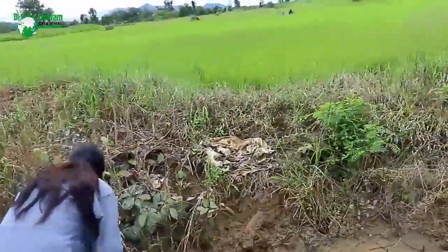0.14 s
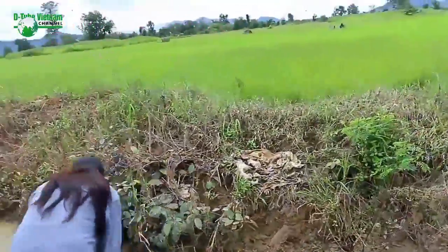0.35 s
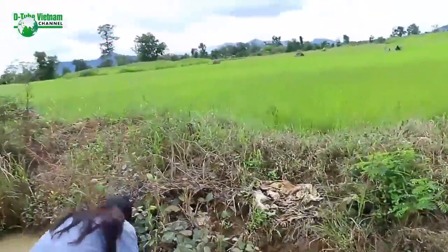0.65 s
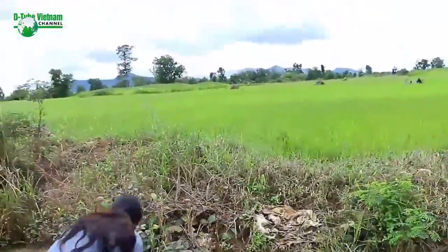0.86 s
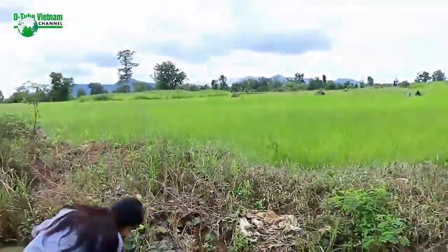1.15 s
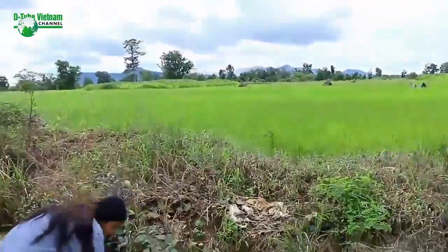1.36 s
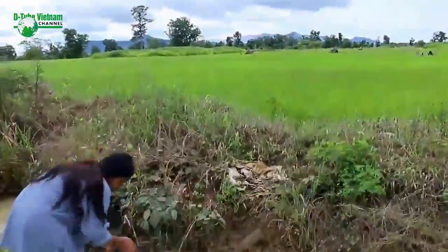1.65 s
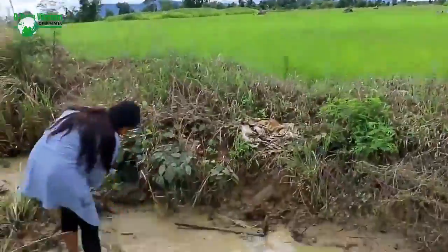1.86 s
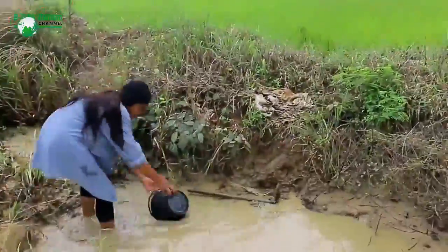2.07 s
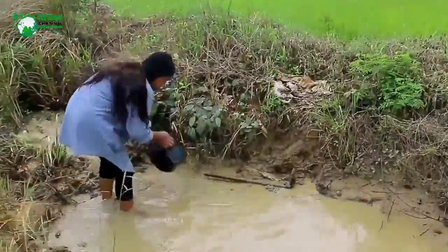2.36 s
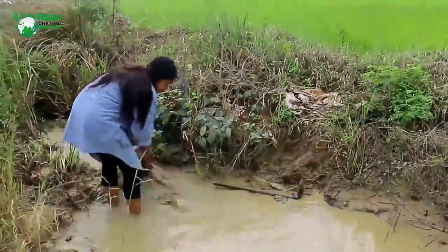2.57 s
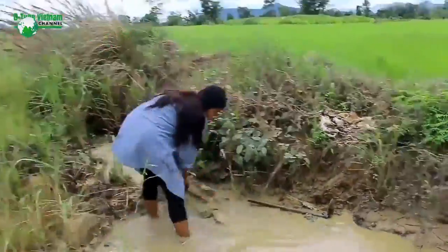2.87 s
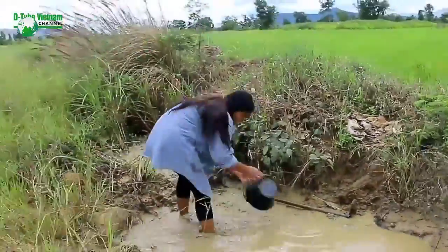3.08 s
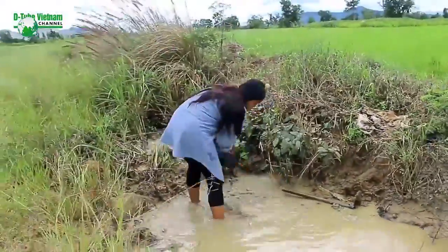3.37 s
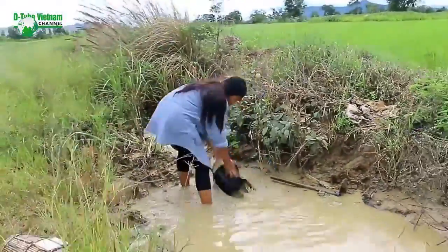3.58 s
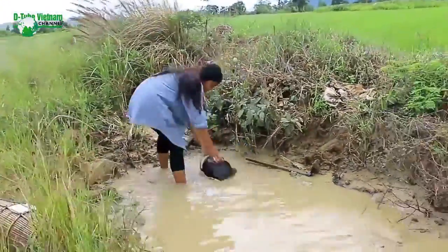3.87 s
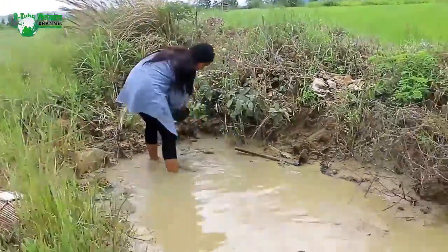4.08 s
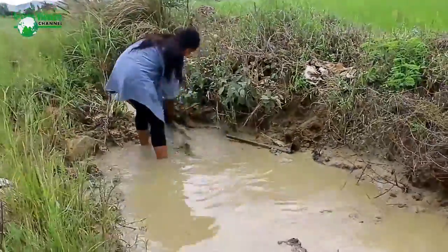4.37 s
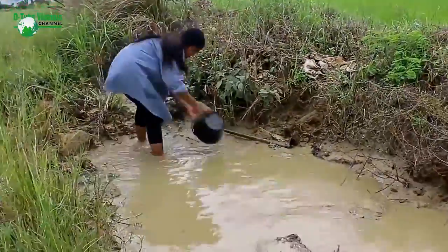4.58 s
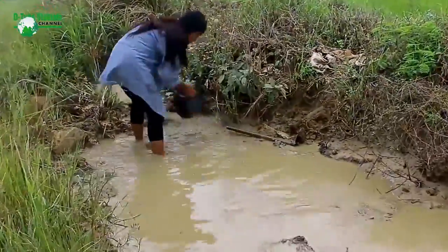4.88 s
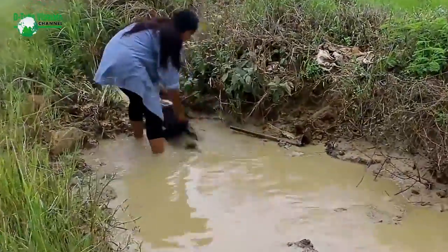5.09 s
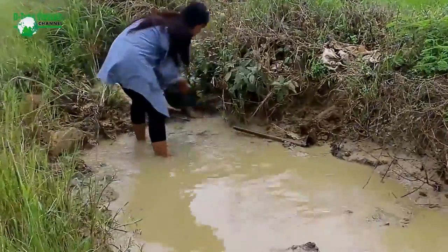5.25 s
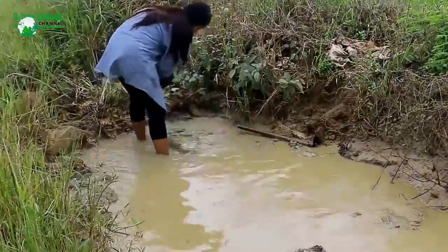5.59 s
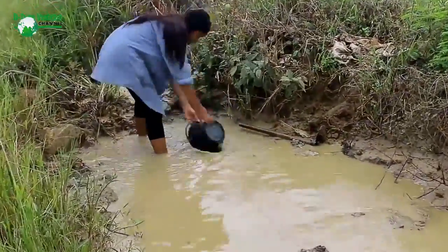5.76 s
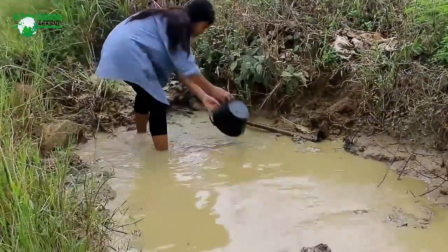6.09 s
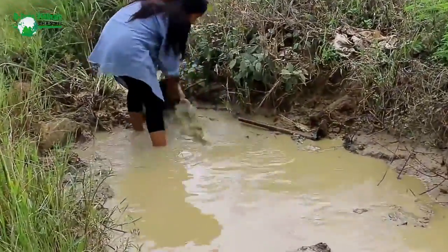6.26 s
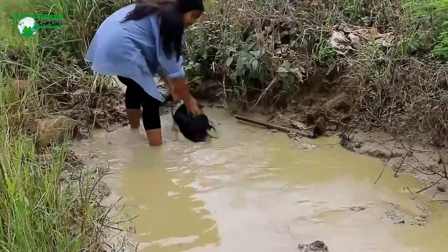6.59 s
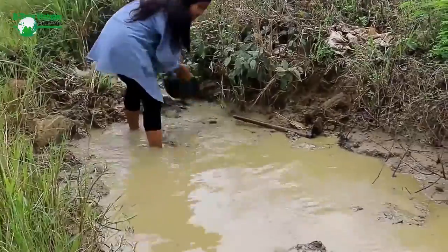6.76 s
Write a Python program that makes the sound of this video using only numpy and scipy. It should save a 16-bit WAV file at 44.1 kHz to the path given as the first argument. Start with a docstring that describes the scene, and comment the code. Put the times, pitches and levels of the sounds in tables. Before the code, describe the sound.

Outdoors beside a field, steady fast bailing: dip, swelling swish, then a sharp watery slap with hollow gulping, repeated throughout with slight variation. Stray drops and slops fill the gaps over a thin trickle. Gusts strike the stereo microphones separately, often harder on the left, as low rumbles and dull thumps, strongest in the middle. Tiny high bird notes and a faint hush lie behind the close, fairly dry water.

```python
"""Bailing a muddy pool

Someone standing in a shallow pool bails it with a small bucket, nearly three times a second.
Each throw is a swish of stirred noise, a slap of dense patter with gulping, rising tones for trapped air,
and smaller slops and a steady trickle. The bucket rings as hollow, tuned noise.
Gusts buffet the two microphones of a camera on the bank: low rumble, flutter, thumps and one hoot.
Small birds chip in the field as short gliding tones, over a faint hush of noise."""
import sys
import numpy as np
from scipy import signal
from scipy.fft import rfft, irfft, next_fast_len
from scipy.io import wavfile
from scipy.ndimage import map_coordinates

SR = 44100
rng = np.random.default_rng(int(sys.argv[2]) if len(sys.argv) > 2 else 0)


def transcribe(u):
    """Save the signal u as a 16-bit wav file named by the first command-line argument.

    u: samples, shape (n,) or (channels, n), limited to [-1, 1]; the rate is SR.
    q: integer samples, one column per channel.
    """
    v = np.clip(np.atleast_2d(u).T, -1, 1)
    q = np.round(v * 32767).astype(np.int16)
    wavfile.write(sys.argv[1], SR, q)


N = 305613  # length in samples

# Levels in the tables are relative: the functions add further gains when mixing.
# Throws of the bucket. Each row: landing in seconds, how long before it the bucket dips in seconds,
# dip length in seconds, dip level in dB, dip spray in dB, swash in dB, ring of the bucket in dB,
# slap length in seconds, thud in dB, splat in dB.
THROWS = [(0.132, .19, .026, -48, -59, -30.5, -44, 0.011, -20, -22.5),
          (0.517, 0.14, 0.037, -35, -49, -31, -40, 0.017, -19.5, -20),
          (0.879, 0.19, 0.013, -33, -53, -33.5, -35.5, 0.017, -27.5, -36),
          (1.262, 0.25, 0.075, -33.5, -53, -32.5, -38, .017, -17, -25),
          (1.631, 0.19, 0.011, -32, -46, -33.5, -46, 0.024, -24, -26.5),
          (1.984, 0.32, 0.043, -46, -72, -33, -40, 0.021, -27, -25.5),
          (2.355, 0.19, 0.083, -35, -49, -36.5, -54, 0.023, -22.5, -25.5),
          (2.726, 0.2, 0.031, -35.5, -51, -34.5, -41, 0.021, -23, -25.5),
          (3.075, 0.2, 0.05, -32.5, -47, -35.5, -49, 0.015, -18, -25),
          (3.444, 0.19, 0.034, -36, -49, -34.5, -39, 0.016, -28, -41),
          (3.805, 0.19, 0.016, -38.5, -45, -70, -42.5, 0.014, -30.5, -63),
          (4.18, 0.2, 0.022, -54, -51, -43, -45, 0.011, -25.5, -27),
          (4.539, 0.216, 0.12, -37.5, -50.5, -40.5, -37.5, 0.021, -21.5, -25),
          (4.922, 0.21, 0.061, -31, -48.5, -39, -35, 0.022, -21, -25),
          (5.303, 0.19, 0.03, -36, -53, -39.5, -36, 0.014, -23.5, -24.5),
          (5.678, .2, 0.044, -34, -47, -39.5, -30, 0.014, -23, -23.5),
          (6.048, 0.18, 0.054, -35.5, -49.5, -43.5, -46, 0.044, -49, -30.5),
          (6.432, 0.19, 0.047, -41, -47.5, -36, -38, 0.015, -30, -28.5),
          (6.8, 0.19, 0.063, -37, -47.5, -37, -38, 0.028, -33.5, -31.5)]
# Stray water falling back. Each row: start in seconds, length in seconds, thud in dB, splat in dB.
SLOPS = [(0.262, 0.013, -43, -34), (0.427, 0.029, -55, -44), (0.611, 0.0093, -28, -34),
         (0.808, .04, -32, -35), (1.43, 0.019, -33, -33), (1.769, 0.026, -34, -36),
         (2.082, 0.0087, -35, -32.5), (2.826, 0.019, -26, -29.5), (2.919, 0.0072, -41, -37),
         (3.172, 0.0066, -25, -24.5), (3.276, 0.013, -49, -31.5), (3.368, 0.019, -33, -43),
         (3.636, 0.013, -44, -36), (5.03, 0.011, -31, -34.5), (5.133, 0.0073, -49, -33.5),
         (5.397, 0.008, -49, -32), (5.468, 0.0069, -53, -29), (5.631, 0.0061, -28, -33),
         (5.773, 0.0095, -28, -37), (5.822, 0.0079, -34, -37.5), (6.161, 0.023, -32, -31.5),
         (6.211, 0.0099, -52, -31), (6.562, 0.0095, -32.5, -35)]
# Large pockets of air trapped by landing water. Each row: start in seconds, level in dB, pitch in Hz.
GULPS = [(0.1245, -3.5, 347), (0.1314, -7, 408), (0.5303, -2.5, 1060), (0.614, -19.5, 398),
         (0.879, -14.5, 360), (1.2685, -5.5, 910), (1.2748, -10, 516), (1.28, -10, 880),
         (1.4277, -11.5, 910), (1.637, -20, 615), (2.002, -12.5, 390), (2.3626, -17, 674),
         (2.7259, -5, 1150), (2.832, -14, 570), (2.9558, -6, 380), (3.073, -7, 320), (3.083, -20, 764),
         (3.177, -14, 287), (3.4434, -5, 600), (3.64, -13, 510), (3.882, -12.5, 500), (4.184, -10, 425),
         (4.5207, -17, 416), (4.534, -3.5, 378), (4.552, -7, 417), (4.9199, -8.5, 396), (4.928, -10.5, 510),
         (4.9369, -5.5, 575), (5.133, -22, 980), (5.303, -7, 377), (5.311, -4, 407), (5.3183, -4, 620),
         (5.629, -11, 865), (5.671, -8, 1940), (5.6725, -7.5, 780), (5.676, -2, 414), (6.062, -28, 620),
         (6.1646, -16, 340), (6.432, -22, 417), (6.442, -19, 474), (6.566, -20, 590)]
# Cavities that close with a bloop. Each row: start in seconds, first pitch in Hz, level in dB,
# cycles of ring, share by which the pitch rises in that time.
BLOOPS = [(0.127, 838, -15.5, 3.8, 1), (0.143, 653, -26, 8.1, 0.34), (0.51, 1190, -27, 11.6, 0.84),
          (0.673, 730, -38, 15.4, 0.53), (1.778, 700, -26.5, 7.2, 0.26), (2.557, 1250, -31, 16, 0.12),
          (2.886, 1000, -36, 4.7, .1), (4.238, 2070, -30.5, 10, .05), (4.766, 892, -30, 10, .05),
          (5.4942, 486, -23, 3.6, 0.83), (5.515, 1570, -32, 10, 0.043), (5.634, 850, -22.5, 6.3, 0.016),
          (5.766, 314, -18, 2.3, 0.98), (5.789, 370, -29.5, 3.7, 0.076), (5.823, 1730, -33, 9, 0.027),
          (6.562, 1260, -33, 16, 0.035)]
# Single sharp drops. Each row: start in seconds, level in dB, middle pitch in Hz.
DROPS = [(2.238, -19.5, 4220), (2.556, -25, 2900), (4.993, -21, 4030), (5.084, -15.5, 3050)]
# Tone colour of the water sounds. Each row: frequency in Hz, relative level in dB.
THUD_COLOUR = [(120, -6), (250, 6.5), (380, -1), (700, 3.5), (1050, -7), (1500, -67), (3000, -32)]
SPLAT_COLOUR = [(600, -6), (1050, -7), (1800, -3), (3300, -6.5), (4600, -14), (8000, -50)]
SPRAY_COLOUR = [(2500, 2.5), (4500, -1), (6000, -1.5), (8000, -2.5), (11000, -6.5), (15500, -14.5)]
SLOSH_COLOUR = [(150, -50), (250, 1), (313, 3.5), (455, 1.5), (521, -18), (624, -0.5), (693, -3.5),
                (1150, -20), (1400, -0.5), (1920, -6.5), (2370, 0), (2590, -2), (3770, -2.5), (5250, -9),
                (9000, -20.5), (11700, -63), (19800, -120)]
GURGLE_COLOUR = [(300, 6), (450, -20), (700, 7), (1050, 9), (1600, -9), (2300, -7), (4000, -21)]
# Rise and fall of the spray. Each row: time in seconds, level in dB.
SPRAY_LEVEL = [(0, -1), (.6, -2.5), (1.2, -1), (1.7, 0.5), (2.3, 2.5), (2.9, 2), (3.5, 0), (4.1, -0.5),
               (4.7, 1), (5.5, 1.5), (6.2, 1.5), (6.93, 0)]
# How hollow the stirred water sounds. Each row: time in seconds, lift of the gurgle in dB.
HOLLOWNESS = [(0, 4.5), (.5, 7), (1, 4), (1.5, 8.5), (2, 6.5), (2.5, 1.5), (3.3, 2.5), (4, 7), (5, 2),
              (5.7, 2.5), (6.3, 0), (6.93, 1.5)]
# The bucket's hollow, rung by the water. Each row: frequency in Hz, width in Hz, level in dB.
BUCKET_TONES = [(376, 53, -2), (670, 92, 1.5), (998, 43, 4), (1680, 78, -10.5)]
# How much the water's sound differs between the microphones.
# Each row: frequency in Hz, share from 0 (the same in both) to 1 (unrelated).
SCATTER = [(100, .3), (400, .07), (1000, .07), (2200, .22), (4000, .46), (15000, .58)]
# Bearing of the bucket. Each row: time in seconds, delay of the left microphone in milliseconds.
LEAD = [(0, 0.11), (1.5, 0.092), (2.3, 0.058), (3.5, 0.034), (4.5, 0.035), (6.93, 0.044)]
# Gusts. Each row: time in seconds, buffet in dB, left minus right in dB, flutter in dB.
WIND = [(0, -84, 1, -71), (.45, -51, 4, -73), (.54, -33, 11, -37), (.68, -34, 1, -68), (.93, -52, -3, -57),
        (1.01, -33.5, 17, -47), (1.3, -28.5, 13, -32.5), (1.7, -38, 16, -61), (1.8, -44.5, -5, -60),
        (1.95, -31, 1.5, -57), (2.2, -29, 15, -40), (2.27, -40, -8, -68), (2.52, -39.5, 17, -56),
        (2.6, -19, 3, -28.5), (2.8, -31.5, 5, -61), (2.97, -28, 1, -17), (3.17, -27, 5, -31),
        (3.25, -41.5, 8, -65), (3.38, -32.5, 6.5, -34), (3.67, -24, 4, -24), (3.94, -32.5, -8, -37),
        (4.12, -32, 17, -26.5), (4.29, -28.5, -8, -36.5), (4.56, -25.5, 2.5, -25), (4.76, -36.5, -22, -28),
        (4.95, -38.5, 0.5, -41.5), (5.1, -32, -15, -37.5), (5.4, -39.5, 11, -40), (5.62, -74, 6, -84),
        (5.92, -39, 3.5, -47), (6.4, -45, -2, -68), (6.69, -33.5, 0, -69), (6.74, -30.5, 13, -37),
        (6.93, -25.5, 13, -28)]
# Tone colour of the wind. Each row: frequency in Hz, relative level in dB.
BUFFET_COLOUR = [(15, -33), (30, -13), (60, -3.5), (90, 2.5), (170, -3), (250, -12.5), (400, -33),
                 (800, -68), (2000, -83)]
FLUTTER_COLOUR = [(70, -49), (140, 5), (220, 3.5), (310, 1), (430, -8), (650, -13.5), (1000, -35),
                  (2500, -68)]
# The hardest eddies striking the microphones.
# Each row: start in seconds, level in dB, left minus right in dB, pitch in Hz before it wavers.
HARD_EDDIES = [(1.023, -19, 22, 204), (1.085, -22, 18, 167), (1.121, -16.5, 23, 187.6),
               (1.202, -15.5, 24, 232), (1.295, -5.5, 21, 193), (1.305, -10.5, 18, 211),
               (1.539, -14, 19, 174), (1.672, -17, 14, 229), (2.137, -23, 14, 250), (2.193, -13, 14, 213),
               (2.612, -6, 12, 278.5), (2.637, -19, 18, 303), (2.648, -18, 0, 205), (2.662, -12.5, -4, 221),
               (2.707, -22, -2, 214), (2.941, -9.5, 14, 254), (2.962, -13, 3, 220), (2.982, -12, 0, 190),
               (3.001, -8, 11, 289), (3.046, -27, -6, 208), (3.486, -10, -6, 199.6),
               (3.518, -12.5, -6, 173), (3.54, -8.5, 3, 275), (3.576, -9, 4, 219), (3.602, -13, -16, 181),
               (3.64, -10, -3, 181.5), (3.663, -18, 0, 175), (3.741, -13.5, 3, 314), (3.755, -7, 9, 176),
               (3.815, -13, 8, 170), (3.881, -10.5, 8, 241), (4.041, -10.5, 18, 264), (4.078, -6.5, 2, 182),
               (4.128, -7.5, 0, 212), (4.151, -7.5, 20, 172), (4.435, -13, 1, 190), (4.458, -11, -4, 202),
               (4.496, -6.5, -3, 191), (4.521, -4, 13, 293), (4.603, -16, -8, 189), (4.62, -9.5, -16, 173),
               (4.631, -13, -23, 258), (4.765, -8, -20, 238), (4.864, -16, 2, 192), (5.376, -15, 27, 173),
               (5.41, -13.5, 18, 181), (5.535, -24.5, 11.5, 112.5), (6.736, -12.5, 28, 167),
               (6.824, -13.5, 15, 196.5), (6.871, -8, 19, 202.4)]
# A gust sounding a microphone port. The one row: start in seconds, length in seconds, level in dB,
# left minus right in dB, pitch in Hz.
HOOT = (4.5, 0.14, -21, -22, 252)
# One bird's thin falling chips. Each row: start in seconds, level in dB, length in seconds,
# middle pitch in Hz.
CHIPS = [(1.883, -37.5, 0.015, 7540), (2.157, -36.5, 0.0081, 7740), (2.203, -45, .009, 7700),
         (2.452, -42, 0.0087, 7660), (2.471, -40, 0.018, 7300), (2.495, -38.5, .009, 7700),
         (2.854, -42, 0.022, 7460), (3.183, -41.5, 0.015, 7550), (3.481, -43, 0.03, 7280),
         (3.817, -49, 0.01, 7250), (3.876, -48, .009, 7350)]
# Another bird's slurred notes. Each row: start in seconds, level in dB, length in seconds,
# first pitch in Hz, last pitch in Hz.
SLURS = [(3.252, -38.5, 0.026, 3750, 4460), (3.338, -37, 0.011, 3870, 2900), (3.42, -46, 0.027, 3450, 4000),
         (3.589, -44.5, .027, 3380, 4150), (3.747, -46.5, 0.025, 3520, 4150),
         (3.771, -49, 0.011, 4130, 3320), (3.917, -45, 0.024, 3350, 4050), (3.947, -45.5, .012, 3880, 3300),
         (4.096, -42, 0.019, 4200, 3300), (4.268, -37.5, 0.012, 4020, 3030), (4.43, -40, 0.021, 4050, 3430),
         (4.601, -38, 0.022, 4020, 2180), (4.778, -36, 0.019, 4240, 2550), (4.953, -37, 0.018, 4400, 3240),
         (5.122, -39, 0.023, 4040, 3070), (5.541, -40, .024, 3400, 3870), (5.707, -39, 0.023, 3320, 4050),
         (5.881, -39, 0.016, 3470, 4100), (5.899, -44, .013, 4000, 2900)]
# Tone colour of the field's hush. Each row: frequency in Hz, relative level in dB.
FIELD_COLOUR = [(30, 5), (150, 13), (500, -8), (850, -3), (1010, 4.5), (1200, -7), (3500, -5), (5500, -14),
                (15000, -41)]

# A thrown sheet builds up more slowly than a slop.
THROW_RISE_S, SLOP_RISE_S = 0.0056, 0.004
SLAP_SPRAY_DB = -10  # fine spray of a slap, set from its splat
CRACK_DB, CRACK_S = -26, .0012  # water snaps shut over a pocket: level set from the gulp, decay
DIP_RISE_S, DIP_FALL_S = 0.011, 0.033  # the rim cuts into the pool
# The swash is full from SWASH_S before the landing, and the ring from POUR_S before it.
SWASH_S, SWASH_RISE_S, SWASH_FALL_S = 0.061, 0.13, 0.038
POUR_S, POUR_RISE_S, POUR_FALL_S = 0.034, 0.019, 0.022
SWASH_SPRAY_DB = -14.5  # set from the swash
TRICKLE_DB, TRICKLE_SPRAY_DB = -44.5, -56.5  # water running back all the time
BUCKET_SLAP_DB, BUCKET_SLOSH_DB = -12, -14  # gain of the hollow ring in the slaps and in the slosh
BUFFET_DB, FLUTTER_DB = 4, 3.5  # gains of the rumble and the flutter
# Ordinary eddies: level set from the buffet, spread of level, central pitch.
EDDIES_PER_S, EDDY_DB, EDDY_SCATTER_DB, EDDY_HZ = 8.7, 10.5, -2, 169
HOOT_WIDTH_HZ = 30  # how far either side of its pitch the hoot reaches
CHIP_FALL_HZ = 550  # how far each chip falls
DUCK_DB, DUCK_RATIO, DUCK_S = -20, 0.29, 0.024  # gain control: threshold, dB lost per dB over it, memory
TOP_HZ = 15500  # band limit


def splashes(fall=0.0059, tail=0.042, tail_db=-23.0, lead=0.078, lead_db=-25):
    """Each sheet of water follows its leading drops, slaps down as a dense, bubbly patter and stops quickly."""
    t, power = np.arange(N) / SR, np.zeros((3, N))
    for s, rise, length, thud_db, splat_db in landings():
        db = [thud_db, splat_db, splat_db + SLAP_SPRAY_DB]
        near = slice(max(int((s - .1) * SR), 0), int((s + .25) * SR))
        before = np.maximum(s - t[near], 0)
        after = np.maximum(t[near] - s - length, 0)
        arrive = np.exp(-before / rise) + amp(lead_db) * np.exp(-before / lead)
        leave = np.exp(-after / fall) + amp(tail_db) * np.exp(-after / tail)
        power[:, near] += (amp(db)[:, None] * arrive * leave) ** 2
    thud, splat, spray = np.sqrt(power)

    slap = coloured(patter(rate=1500, spread_db=3, smooth=.3), THUD_COLOUR)
    slap = unit(np.tanh(.7 * slap))
    hollow = bucket(patter(rate=1500, spread_db=2, smooth=.3))
    spatter = coloured(patter(rate=1300, spread_db=4.5, smooth=.2), SPLAT_COLOUR)
    spatter = patchy(spatter, depth_db=4, width=2, frames=3)
    mist = coloured(patter(rate=5000, spread_db=3.5, smooth=.6), SPRAY_COLOUR)
    mist = patchy(mist, depth_db=3, width=9, frames=2)
    fizz = bubbles(count=3000, centre_hz=1600, octaves=.55, cycles=6, spread_db=3)
    spatter = unit(spatter + amp(-6) * fizz)

    body = thud * (amp(-4.5) * slap + amp(BUCKET_SLAP_DB) * hollow)
    spray_level, = curves(SPRAY_LEVEL)
    return body + amp(-3.0) * splat * spatter + amp(spray_level) * spray * mist


def landings():
    """All water that hits the pool or bank: rows of (s, rise s, length s, thud dB, splat dB)."""
    throws = [(s, THROW_RISE_S, *slap)
              for s, stroke, dip_s, dip, dip_spray, swash, ring, *slap in THROWS]
    slops = [(s, SLOP_RISE_S, *slap) for s, *slap in SLOPS]
    return throws + slops


def plops():
    """Large pockets of air gulp under the slaps, smaller ones bloop, and a few drops tick sharply."""
    track, t = np.zeros(N), np.arange(SR // 20) / SR
    for s, db, hz in GULPS:
        cavity = bubble(t, hz, cycles=1.9, glide=0.04, hold=1.8)
        # a second, higher pitch rings weakly with it
        cavity = cavity + 0.14 * bubble(t, hz * rng.uniform(1.4, 2.08), cycles=2.9, glide=0.165)
        crack = signal.lfilter([1], [1, -.8], rng.standard_normal(len(t))) * np.exp(-t / CRACK_S)
        add(track, s, amp(db - 0.4) * cavity)
        add(track, s + .5 / hz, amp(db + CRACK_DB) * crack)
    for s, hz, db, cycles, glide in BLOOPS:
        add(track, s, amp(db + 3) * bubble(t, hz, cycles, glide, hold=1.8))
    for s, db, hz in DROPS:
        band = signal.butter(2, [hz * .7, hz * 1.3], "bandpass", fs=SR, output="sos")
        snap = unit(signal.sosfilt(band, rng.standard_normal(len(t))))
        add(track, s, amp(db - 1.5) * snap * np.exp(-t / .0016))
    return np.array([track, np.roll(track, SR // 500)])  # the scattered copy is 2 ms late


def slosh():
    """Bucket and legs churn the pool: crackle, gurgle, bubbles, droplets and spray, in small spurts."""
    slosh_gain, spray_gain = stirring()
    hollow_db, = curves(HOLLOWNESS)
    spray_level, = curves(SPRAY_LEVEL)
    surge = spurts(rate=90, life=.007, steady=1.2)
    churn = coloured(patter(rate=2000, spread_db=4.2, smooth=.35), SLOSH_COLOUR)
    churn = patchy(churn, depth_db=3.5, width=1.5, frames=4)
    gurgle = coloured(patter(rate=700, spread_db=3, smooth=.2), GURGLE_COLOUR)
    gurgle = patchy(gurgle, depth_db=4, width=1.5, frames=4)
    hollow = bucket(patter(rate=500, spread_db=3, smooth=.2))
    fizz = bubbles(count=3000, centre_hz=2350, octaves=.44, cycles=12, spread_db=4)
    droplets = bubbles(count=560, centre_hz=1500, octaves=.55, cycles=11, spread_db=3.5)
    cloud = amp(-7.3) * fizz + amp(-10.3) * droplets
    spray = coloured(patter(rate=4500, spread_db=4, smooth=.7), SPRAY_COLOUR)
    spray = patchy(spray, depth_db=4, width=2.5, frames=3)

    body = amp(-3.0 - .5 * hollow_db) * churn  # more gurgle means less crackle
    body += amp(hollow_db - 12.0) * gurgle
    body += amp(BUCKET_SLOSH_DB) * hollow
    body += np.array([cloud, np.roll(cloud, SR // 150)])
    return surge * (slosh_gain * body + amp(spray_level + 7.5) * spray_gain * spray)


def stirring():
    """Gains of slosh and spray: each stroke dips the bucket, then a swash builds until the water lands."""
    dips, dip_sprays, swashes = np.zeros((3, N))
    for s, stroke, dip_s, dip_db, spray_db, swash_db, ring_db, *slap in THROWS:
        dip = swell(s - stroke, dip_s, DIP_RISE_S, DIP_FALL_S)
        swash = swell(s - SWASH_S, SWASH_S + slap[0], SWASH_RISE_S, SWASH_FALL_S)
        dips += (amp(dip_db) * dip) ** 2
        dip_sprays += (amp(spray_db) * dip) ** 2
        swashes += (amp(swash_db) * swash) ** 2
    water = dips + swashes + amp(TRICKLE_DB) ** 2
    spray = dip_sprays + swashes * amp(SWASH_SPRAY_DB) ** 2 + amp(TRICKLE_SPRAY_DB) ** 2
    return np.sqrt(water), np.sqrt(spray)


def pouring():
    """As the water runs out over the rim, the emptying bucket rings."""
    gain = np.zeros(N)
    for s, *stroke, ring_db, length, thud, splat in THROWS:
        gain += amp(ring_db) * swell(s - POUR_S, POUR_S + length, POUR_RISE_S, POUR_FALL_S)
    return gain * bucket(patter(rate=900, spread_db=2, smooth=.2))


def bucket(x):
    """x ringing in the bucket's hollow, at rms 1; the pitch drifts with the water inside."""
    def response(f):
        total = 0
        for k, (centre, width, db) in enumerate(BUCKET_TONES):
            resonance = 1j * f * width / (centre ** 2 - f ** 2 + 1j * f * width)
            total = total + (-1) ** k * amp(db) * resonance
        return total
    ring = filtered(x, response)
    # reading the sound at a wandering pace bends its pitch
    drift = np.arange(N) + .0011 * SR * wobble(12)
    return unit(np.array([np.interp(drift, np.arange(N), row) for row in ring]))


def microphones(pair):
    """Direct sound reaches the right microphone first; what the banks scatter differs between the two."""
    def response(hz):
        share = np.clip(along(SCATTER, hz), 0, 1) / 2
        return np.sqrt([1 - share, share])
    direct, scattered = filtered(pair, response)
    lead_ms, = curves(LEAD)
    left = map_coordinates(direct + scattered, [np.arange(N) - lead_ms * SR / 1000], order=5)
    return np.array([left, direct - scattered])


def wind():
    """Wind hits each microphone separately: a lumpy rumble, and a rough flutter that follows the gusts."""
    buffet_db, pan_db, flutter_db = curves(WIND)
    lumps = unit(amp(4 * np.tanh([wobble(45), wobble(45)])))
    rumble = coloured(rng.standard_normal((2, N)), BUFFET_COLOUR)
    flutter = coloured(patter(rate=220, spread_db=1.5, smooth=.17), FLUTTER_COLOUR)
    gusts = amp(buffet_db + BUFFET_DB) * rumble + amp(flutter_db + FLUTTER_DB) * flutter
    sides = amp([pan_db / 2, -pan_db / 2])
    return lumps * gusts * sides / np.sqrt(np.mean(sides ** 2, axis=0))


def eddies(rise_cycles=0.58, fall_cycles=0.99, waver=0.51):
    """A strong eddy is a thump of a few uneven pressure swings, wavering apart at the two microphones."""
    pair, t = np.zeros((2, N)), np.arange(-SR // 40, SR // 16) / SR
    knot_times = np.linspace(t[0], t[-1], 64)
    for s, db, pan_db, hz in list(HARD_EDDIES) + ordinary_eddies():
        shape = np.exp(np.minimum(t * hz / rise_cycles, -t * hz / fall_cycles))
        sides = unit(amp([pan_db / 2, -pan_db / 2]))
        wavers = np.clip(rng.standard_normal((2, 64)), -2, 1)
        for track, side, knots in zip(pair, sides, wavers):
            pace = hz * np.exp(waver * np.interp(t, knot_times, knots))
            swings = np.sin(2 * np.pi * np.cumsum(pace) / SR)
            add(track, s + t[0], amp(db + 2.5) * side * shape * swings)
    return pair


def ordinary_eddies():
    """Eddies at uneven times, whose level and side follow the wind: rows like those of HARD_EDDIES."""
    count = int(EDDIES_PER_S * N / SR)
    chance = rng.uniform(-0.92, 1, (count, 3))
    s = (np.arange(count) + .5 + chance[:, 0] / 2) / EDDIES_PER_S
    times, buffet_db, pan_db, flutter_db = np.transpose(WIND)
    db = np.interp(s, times, buffet_db) + EDDY_DB + EDDY_SCATTER_DB * chance[:, 1]
    hz = EDDY_HZ * 2 ** (0.724 * chance[:, 2])
    return list(zip(s, db, np.interp(s, times, pan_db), hz))


def hoot():
    """One steady gust draws a low, breathy note, a narrow band of noise, from the right microphone's port."""
    s, length, db, pan_db, hz = HOOT
    noise = rng.standard_normal((2, N))
    note = unit(filtered(noise, lambda f: 1 / (1 + ((f - hz) / HOOT_WIDTH_HZ) ** 4)))
    sides = unit(amp([[pan_db / 2], [-pan_db / 2]]))
    return amp(db) * sides * swell(s, length, rise=.03, fall=0.0071) * note


def birds():
    """Each note is one short, slightly rough glide, blurred by the grass on its way."""
    track = np.zeros(N)
    half = CHIP_FALL_HZ / 2
    chips = [(s, db, length, hz + half, hz - half) for s, db, length, hz in CHIPS]
    for s, db, length, first_hz, last_hz in chips + list(SLURS):
        u = np.linspace(0, 1, max(int(length * SR), 8))
        hz = first_hz + (last_hz - first_hz) * u
        shape = np.sqrt(4 * u * (1 - u))
        add(track, s, amp(db + 4.5) * shape * np.sin(2 * np.pi * np.cumsum(hz) / SR))
    t = np.arange(SR // 10) / SR
    grass = rng.standard_normal((2, len(t))) * np.exp(-t / .008)
    grass = grass / np.linalg.norm(grass[0])
    blurred = signal.fftconvolve(track[None], grass, axes=1)[:, :N]
    roughness = unit(amp(2.3 * wobble(700)))
    return (amp(-2.7) * track + amp(-9.5) * blurred) * roughness


def field():
    """The faint hush of the field is steady, coloured noise."""
    return amp(-45) * coloured(rng.standard_normal((2, N)), FIELD_COLOUR)


def bubble(t, hz, cycles, glide, hold=1):
    """An air pocket rings, its pitch rising as it nears the surface; hold over 1: rings on, then stops short."""
    age = t * hz / cycles
    pitch = hz * (1 + glide * np.minimum(age, 3))
    tone = np.sin(2 * np.pi * np.cumsum(pitch, axis=-1) / SR)
    return tone * np.exp(-age ** hold) * (1 - np.exp(-2 * t * hz))


def bubbles(count, centre_hz, octaves, cycles, spread_db):
    """A cloud of small bubbles at random times, of rms 1."""
    when, size = rng.random((2, count, 1))
    hz = np.clip(centre_hz * 2 ** (octaves * rng.standard_normal((count, 1))), 350, 6000)
    k = np.arange(1200)
    loudness = amp(spread_db * np.minimum(-np.log(size), 3))
    rings = loudness * bubble(k / SR, hz, cycles, glide=0.028)
    places = (when * N).astype(int) + k
    return unit(np.bincount(places.ravel(), rings.ravel(), minlength=N)[:N])


def patter(rate, spread_db, smooth):
    """Two rows of tiny random impacts of uneven size on a share of smooth noise."""
    hits = rng.random((2, N)) < rate / SR
    sizes = amp(spread_db * np.minimum(rng.exponential(size=(2, N)), 3))
    sizes = sizes * rng.choice([-1, 1], (2, N))
    return unit(unit(hits * sizes) + smooth * rng.standard_normal((2, N)))


def patchy(x, depth_db, width, frames):
    """Changing cavities and drop clusters lift short patches of the spectrum."""
    z = signal.stft(x, nperseg=512)[2]
    bins, steps = np.indices(z.shape[1:])
    grid = rng.standard_normal((260, 1300))
    patches = map_coordinates(grid, [bins / width, steps / frames], order=1, mode="wrap")
    lifted = z * amp(depth_db * unit(patches))
    return unit(signal.istft(lifted, nperseg=512)[1][:, :N])


def spurts(rate, life, steady):
    """An envelope of rms 1: clumps of drops start abruptly and die away over a steady share."""
    kicks = (rng.random(N) < rate / SR) * rng.uniform(.3, 1, N)
    return unit(steady + signal.lfilter([1], [1, -np.exp(-1 / (life * SR))], kicks))


def swell(start, hold, rise, fall):
    """An envelope that grows until start, holds and dies away; all in seconds."""
    t = np.arange(N) / SR
    growing = np.minimum((t - start) / rise, 0)
    dying = np.minimum((start + hold - t) / fall, 0)
    return np.exp(np.maximum(growing + dying, -20))


def amp(db):
    """Decibels to gain."""
    return 10 ** (np.asarray(db) / 20)


def unit(x):
    """Scale to rms 1."""
    return x / np.sqrt(np.mean(x ** 2) + 1e-20)


def along(points, hz):
    """(Hz, value) points read on a log axis."""
    f, v = np.transpose(points)
    return np.interp(np.log(hz + 1), np.log(f + 1), v)


def curves(rows):
    """One value per sample for each column after the time."""
    s, *cols = np.transpose(rows)
    return [np.interp(np.arange(N) / SR, s, c) for c in cols]


def wobble(rate):
    """A smooth random curve, rate knots a second."""
    return map_coordinates(rng.standard_normal(8192), [np.arange(N) * rate / SR], mode="wrap")


def filtered(x, response):
    """x times a response of frequency."""
    m = next_fast_len(N + 8192)
    return irfft(rfft(x, m) * response(np.fft.rfftfreq(m, 1 / SR)), m)[..., :N]


def coloured(x, spectrum):
    """x given a spectrum, at rms 1."""
    return unit(filtered(x, lambda hz: amp(along(spectrum, hz))))


def add(track, s, sound):
    """Mix a sound into a track at time s."""
    part = track[max(round(s * SR), 0):][:len(sound)]
    part += sound[:len(part)]


def scene():
    """Water and the hush of the field, slightly louder on the left, with birds and wind."""
    water = splashes() + plops() + slosh() + pouring()
    heard = microphones(water + field()) * amp([[.3], [-.3]])
    return heard + birds() + wind() + eddies() + hoot()


def record(dry):
    """The camera eases its gain down as loud moments build, rounds off peaks and cuts above its band limit."""
    keep = np.exp(-1 / (DUCK_S * SR))
    power = signal.lfilter([1 - keep], [1, -keep], np.mean(dry ** 2, axis=0))
    ducked = dry * amp(0.54) * (1 + power / amp(DUCK_DB) ** 2) ** (-DUCK_RATIO / 2)
    rounded = ducked / (1 + np.abs(ducked / .9) ** 6) ** (1 / 6)
    return filtered(rounded, lambda hz: hz < TOP_HZ)


dry = scene()
out = record(dry)
transcribe(out)
```